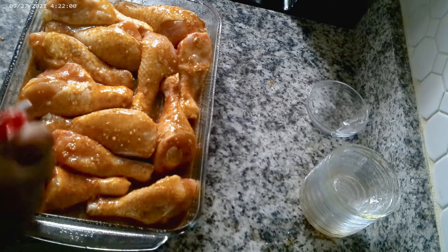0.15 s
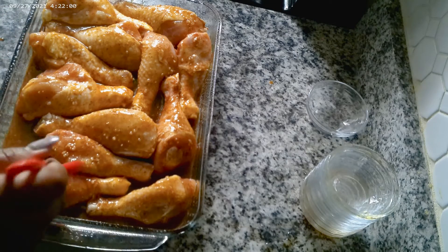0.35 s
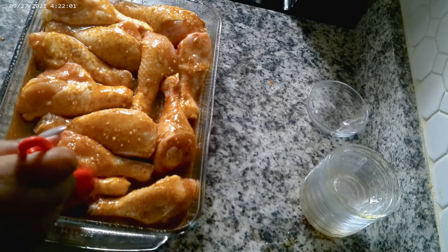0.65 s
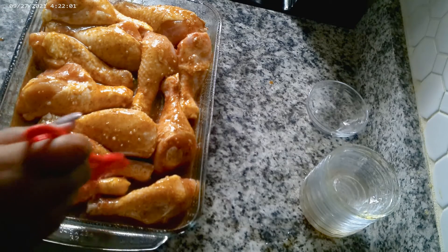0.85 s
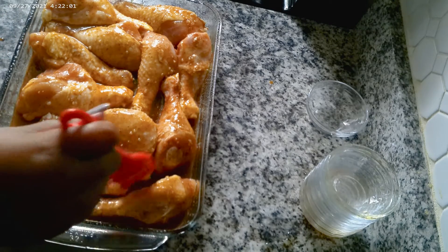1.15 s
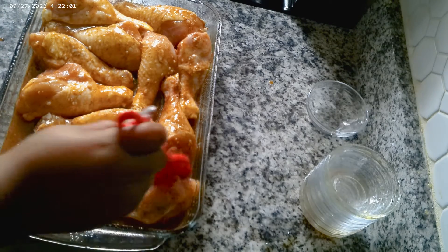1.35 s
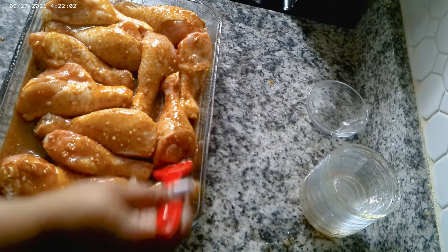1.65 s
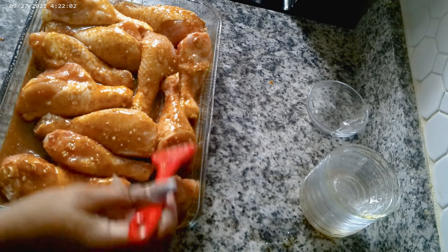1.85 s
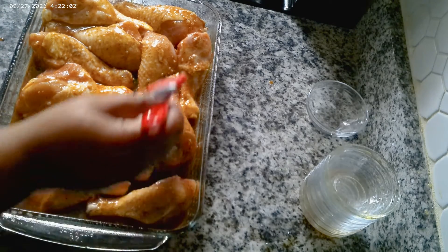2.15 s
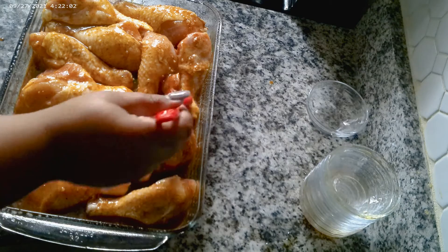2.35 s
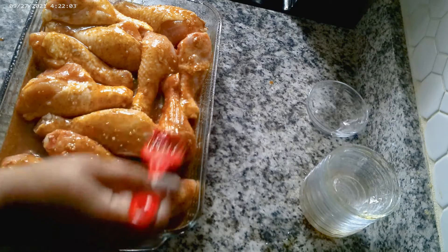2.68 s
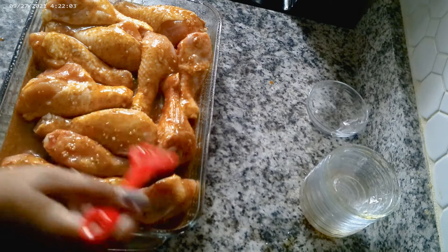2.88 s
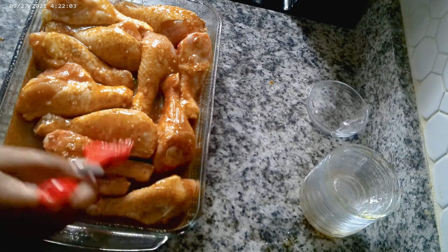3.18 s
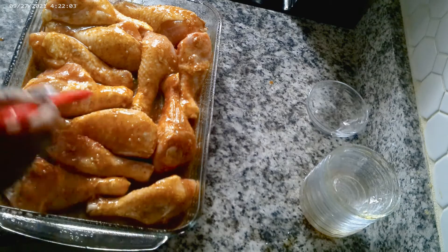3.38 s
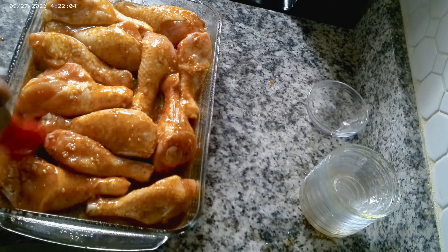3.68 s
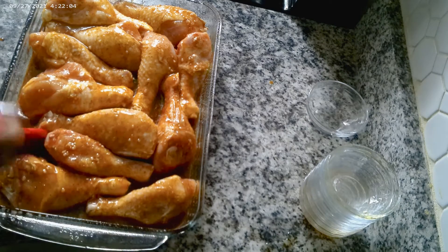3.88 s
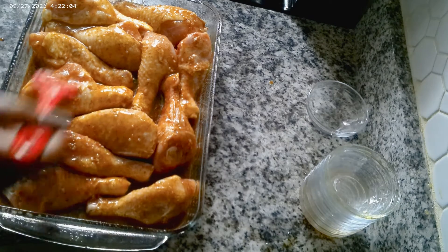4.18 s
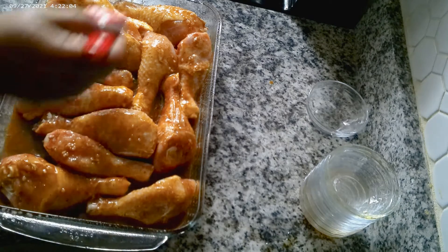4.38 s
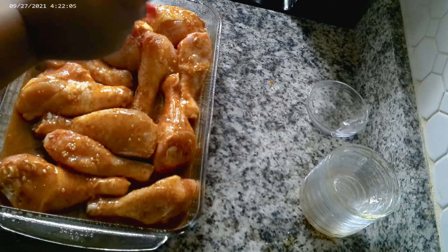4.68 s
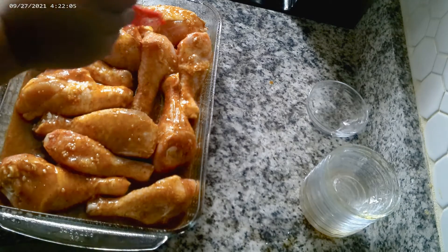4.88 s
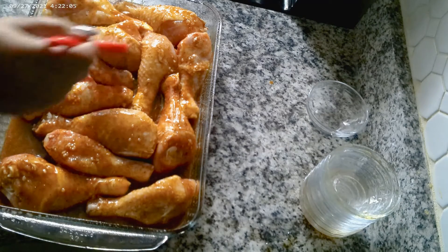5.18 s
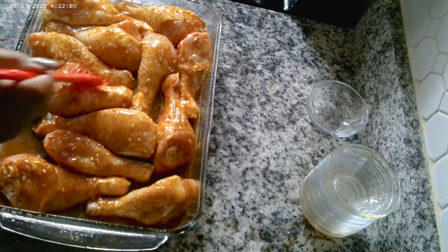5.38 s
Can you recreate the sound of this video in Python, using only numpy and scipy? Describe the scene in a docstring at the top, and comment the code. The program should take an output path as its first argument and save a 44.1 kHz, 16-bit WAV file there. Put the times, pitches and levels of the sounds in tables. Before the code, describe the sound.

A low, steady appliance hum and a soft, dark rush of air run throughout a small tiled kitchen. Close to a single microphone, a loaded glass dish is bumped on stone: two knocks just before one second, a stronger cluster near one and a half, a bright clack soon after, a faint nudge, and a final double thud. Tiny sticky ticks accompany the middle bumps.

```python
"""Small tiled kitchen, one microphone channel: an appliance hums at mains pitch behind, with a soft rush of air.
In front, a silicone brush dabs sauce onto raw chicken in a glass dish on a stone counter.
From 0.7 s to 3.9 s the full dish is bumped: damped glass modes, a noise clack and a low sine thump.
Around 1.5 s sticky bristles let go of the skin with three tiny ticks of resonant noise.
After the last bump dies away only the hum (wavering sines) and the air (shaped noise) are left."""
import sys
import numpy as np
from scipy import signal
from scipy.fft import rfft, irfft
from scipy.io import wavfile

SR = 44100
rng = np.random.default_rng(int(sys.argv[2]) if len(sys.argv) > 2 else 0)


def int16_out(signal):
    """Quantize to a 16-bit WAV file."""
    q = np.round(np.clip(np.atleast_2d(signal).T, -1, 1) * 32767)
    wavfile.write(sys.argv[1], SR, q.astype(np.int16))


N = 243917
TIME = np.arange(N) / SR


def from_db(db):
    """Decibels to amplitude gain."""
    return 10 ** (np.asarray(db) / 20)


def rms_one(x):
    """Scale to rms 1."""
    return x / np.sqrt(np.mean(x ** 2) + 1e-20)


def shaped_noise(spectrum, size):
    """Noise at rms 1 whose spectrum follows (Hz, dB) points, joined by straight lines over log frequency."""
    hz, db = np.transpose(spectrum)
    bin_hz = np.maximum(np.arange(size // 2 + 1) * SR / size, 1)
    gain = from_db(np.interp(np.log(bin_hz), np.log(hz), db))
    white = rfft(rng.standard_normal(size))
    return rms_one(irfft(white * gain, size))


def resonate(x, hz, width_hz):
    """One two-pole resonance with a gain of about 1 at its peak."""
    radius = np.exp(-np.pi * width_hz / SR)
    numerator = np.array([1, 0, -1]) * (1 - radius ** 2) / 2
    denominator = [1, -2 * radius * np.cos(2 * np.pi * hz / SR), radius ** 2]
    return signal.lfilter(numerator, denominator, x)


def low_pass(x, hz):
    """Third-order low-pass."""
    sections = signal.butter(3, min(hz, SR / 2 - 1), fs=SR, output="sos")
    return signal.sosfilt(sections, x)


def dying(t, t60):
    """A decay that loses 60 dB in t60 seconds."""
    return np.exp(-np.log(1000) * t / t60)


def swell(t, rise_s):
    """A soft onset: the contact force takes a moment to build."""
    return 1 - np.exp(-(t / rise_s) ** 2)


def add(track, s, sound):
    """Mix a sound in at a time in seconds."""
    start = round(s * SR)
    track[start:start + len(sound)] += sound[:N - start]


MAINS_HZ = 59.985
# Mains hum of the appliance behind the dish.
# Each row: multiple of the mains frequency, level in dB rms before the waver.
HUM_HARMONICS = [(1, -33.5), (2, -55), (3, -47.5), (4, -63.5), (5, -56.5), (7, -65.5)]


def hum(waver):
    """Mains harmonics, the fundamental by far the strongest, each slowly wavering in level by itself."""
    out = np.zeros(N)
    for multiple, db in HUM_HARMONICS:
        slow = shaped_noise([(1, 0), (4, -3), (20, -40), (100, -120)], N)
        phase = 2 * np.pi * (multiple * MAINS_HZ * TIME + rng.random())
        peak = np.sqrt(2) * from_db(db)
        out += peak * (1 + waver * slow) * np.sin(phase)
    return out


AIR_DB = -43.5  # rms of the broad rush
# Moving air and hiss in the kitchen.
# Each row: frequency in Hz, relative density in dB per Hz.
AIR_SPECTRUM = [(16, 3), (32, -1.5), (50, -15), (85, -9.5), (108, -11.5), (150, -19.5), (260, -21.5),
                (480, -21.5), (800, -23.5), (1100, -32.5), (2000, -41.5), (3300, -44), (8000, -51),
                (15500, -55.5)]
# Narrow resonances in the rush of the appliance.
# Each row: frequency in Hz, width in Hz, level in dB rms.
WHIRR_RESONANCES = [(109.6, 9.3, -56), (733, 20, -65), (842, 6.5, -69.5), (12200, 400, -87.5)]


def air():
    """A steady rush of shaped noise, with a few narrow resonances excited by noise."""
    out = from_db(AIR_DB) * shaped_noise(AIR_SPECTRUM, N)
    for hz, width_hz, db in WHIRR_RESONANCES:
        whirr = resonate(rng.standard_normal(N), hz, width_hz)
        out += from_db(db) * rms_one(whirr)
    return out


# Sticky bristles letting go of the skin.
# Each row: start in seconds, level in dB rms before onset and decay, centre frequency in Hz.
BRISTLE_SMACKS = [(1.4570, -55, 2930), (1.458, -67, 4300), (1.601, -66, 7000)]


def smacks(t60, width_hz, rise_s):
    """Films of sauce snap with a tiny, quickly damped tick of noise."""
    out, t = np.zeros(N), TIME[:SR // 5]
    for s, db, hz in BRISTLE_SMACKS:
        fizz = resonate(rng.standard_normal(len(t)), hz, width_hz)
        fizz = resonate(fizz, hz, width_hz)
        add(out, s, from_db(db) * rms_one(fizz) * dying(t, t60) * swell(t, rise_s))
    return out


KITCHEN_T60_S = 0.38
# The short clack of the contact itself.
# Each row: frequency in Hz, relative dB per Hz at the side wall, relative dB per Hz at the corner.
CLACK_SPECTRUM = [(99, -1.5, -15), (258, 0, -6.5), (450, -1.5, 0.5), (880, -4.5, 1.5), (1070, -10, -7.5),
                  (1480, -10.5, -1.5), (1950, -31.5, -16.5), (2880, -23, -15), (3760, -35, -29.5),
                  (8000, -39, -39)]


def clack(t, place, t60, room_db):
    """Noise for a dense burst of quickly damped modes, with a weaker, longer tail from tiles and counter."""
    spectrum = [(hz, (1 - place) * wall_db + place * corner_db)
                for hz, wall_db, corner_db in CLACK_SPECTRUM]
    tail = from_db(room_db) * dying(t, KITCHEN_T60_S)
    return shaped_noise(spectrum, len(t)) * np.hypot(dying(t, t60), tail)


# Modes of the ringing glass.
# Each row: frequency in Hz, relative dB struck at the side wall, relative dB struck at the corner,
# t60 in seconds before the ring-time factor.
DISH_MODES = [(126.8, -9.5, -8, 0.16), (194.4, -11.5, -14.5, 0.18), (304.7, -8, -28, 0.19),
              (354, -9, -27.5, 0.28), (389.6, -6.5, -22, 0.18), (415, -11, -19.5, 0.26),
              (460, -13.5, -9.5, 0.23), (530, -21, -15.5, 0.38), (577, -28, -16, 0.29),
              (620, -16, -25, 0.41), (678, -13, -6.5, 0.18), (722.5, -29.5, -9, 0.22),
              (791, -19.5, -35, 0.55), (875, -13, -6.5, 0.17), (932, -28, -11, 0.19),
              (1051, -27.5, -19.5, 0.3), (1050, -28, -33, 0.46), (1180, -22, -18, 0.14),
              (1203, -27.5, -27.5, 0.31), (1313, -25, -14.5, 0.22), (1364, -26, -19.5, 0.092),
              (1448, -54, -10.5, 0.12), (1505, -25, -14.5, 0.17), (1574, -28, -24.5, 0.09),
              (1830, -41, -36, 0.15), (1860, -36, -24, 0.2), (2510, -58, -43, 0.081),
              (2550, -43, -37, 0.18), (2840, -44, -37, 0.18)]


def dish_ring(t, place, ring_time, spread_db, lag_s):
    """The place of the blow sets each mode's share; bending waves reach the modes at slightly different moments."""
    hz, wall_db, corner_db, t60 = np.transpose(DISH_MODES)[:, :, None]
    mode_db = (1 - place) * wall_db + place * corner_db
    gain = from_db(mode_db + rng.normal(0, spread_db, hz.shape))
    age = np.maximum(t - rng.uniform(0, lag_s, hz.shape), 0)
    modes = gain * dying(age, t60 * ring_time) * np.sin(2 * np.pi * hz * age)
    return np.sum(modes, axis=0)


# Bumps of the full dish on the stone counter.
# Each row: start in seconds, strength in dB, place from 0 at the side wall to 1 at the corner,
# contact brightness as a low-pass frequency in Hz.
DISH_BUMPS = [(0.7212, -6.5, 0.067, 1650), (0.9396, -4, 0, 2400), (1.4384, -0.1, 0.01, 3060),
              (1.4620, -4, 0, 526), (1.5030, -17.5, 0.52, 1400), (1.737, 0.5, 0.95, 4270),
              (2.7630, -17, 0.17, 554), (3.8104, -2.5, 0.88, 2950), (3.8800, -6.5, 1, 586)]
# The loaded dish rocking on the counter: frequency in Hz, t60 in seconds, build-up in seconds.
DISH_ROCKING = (93.3, 0.28, 0.0062)
# A blow on the side wall rocks the dish more: thump in dB at strength 0, at the side wall and at the corner.
ROCKING_THUMP_DB = (-25.5, -29.5)
# The meat damps a side-wall blow sooner: factor on the mode t60, at the side wall and at the corner.
MEAT_RING_FACTOR = (.78, 0.86)
THUMP_GROWTH = 1.54  # dB of thump per dB of strength: light touches hardly move the heavy dish


def bumps(ring_db, clack_db, rise_s):
    """A clack, a glass ring and a low thump; meat and sauce soften the contact and damp the ring."""
    out, t = np.zeros(N), TIME[:SR // 2]
    rock_hz, rock_t60, rock_rise_s = DISH_ROCKING
    thump = np.sin(2 * np.pi * rock_hz * t) * dying(t, rock_t60) * swell(t, rock_rise_s)
    for s, db, place, bright_hz in DISH_BUMPS:
        place = np.clip(place, 0, 1)
        ring_time = np.interp(place, (0, 1), MEAT_RING_FACTOR)
        thump_db = np.interp(place, (0, 1), ROCKING_THUMP_DB) + THUMP_GROWTH * db
        glass = from_db(ring_db) * dish_ring(t, place, ring_time, spread_db=1.7, lag_s=0.00402)
        contact = from_db(clack_db) * clack(t, place, t60=0.067, room_db=-12.0)
        knock = low_pass((glass + contact) * swell(t, rise_s), bright_hz)
        add(out, s, from_db(db) * knock + from_db(thump_db) * thump)
    return out


def scene():
    """Dish and brush in front, over the appliance in the kitchen."""
    dish = bumps(ring_db=-22.0, clack_db=-24.5, rise_s=0.0022)
    brush = smacks(t60=0.08, width_hz=1300, rise_s=0.0018)
    appliance = hum(waver=0.037) + air()
    return (dish + brush + appliance)[None]


CUTOFF_HZ = 15600


def record(dry):
    """The microphone channel: a steep elliptic low-pass cuts the top."""
    # order 12, ripple 0.1 dB, stop band 90 dB down
    sections = signal.ellip(12, 0.1, 90, CUTOFF_HZ, fs=SR, output="sos")
    return signal.sosfilt(sections, dry)


dry = scene()
out = record(dry)
int16_out(out)
```